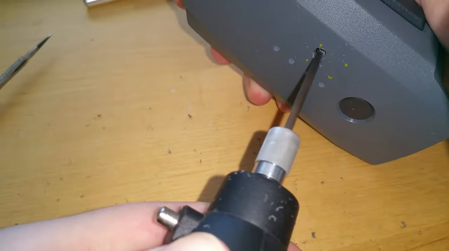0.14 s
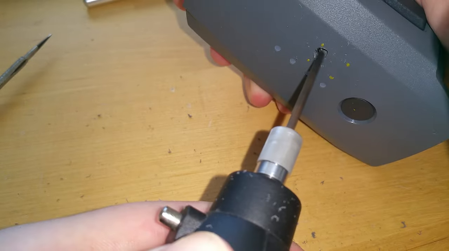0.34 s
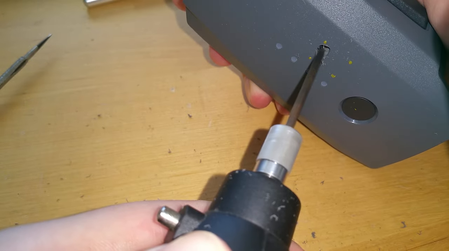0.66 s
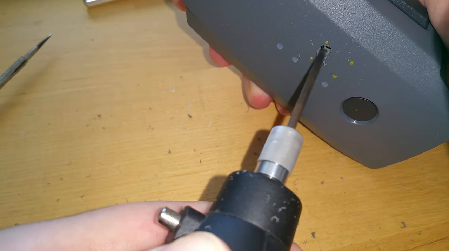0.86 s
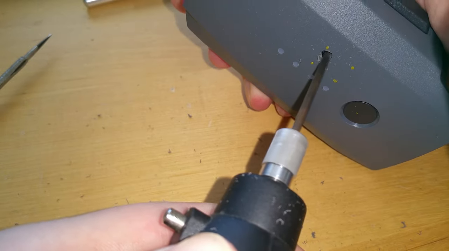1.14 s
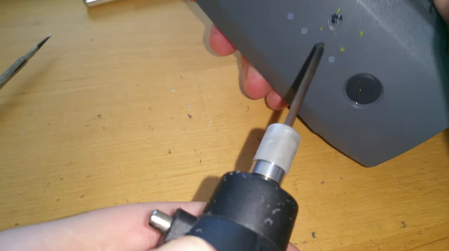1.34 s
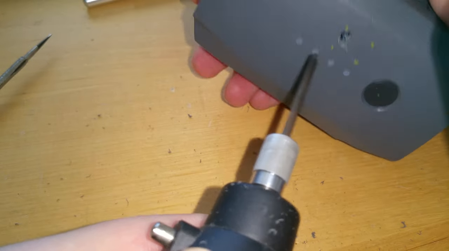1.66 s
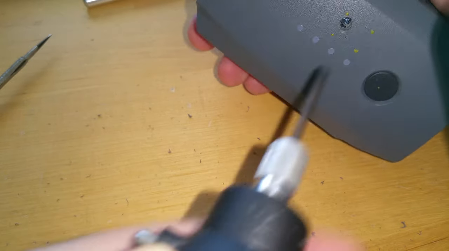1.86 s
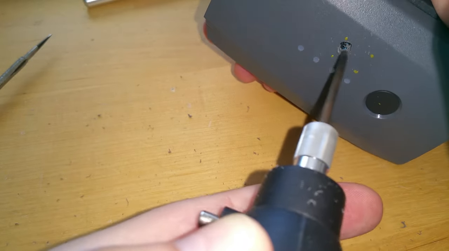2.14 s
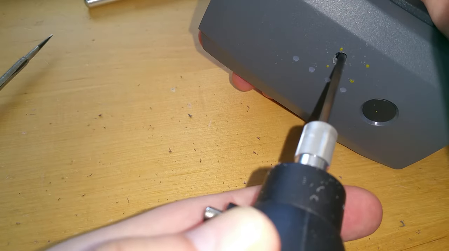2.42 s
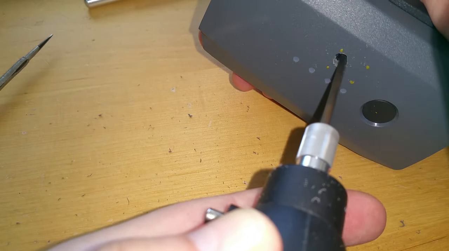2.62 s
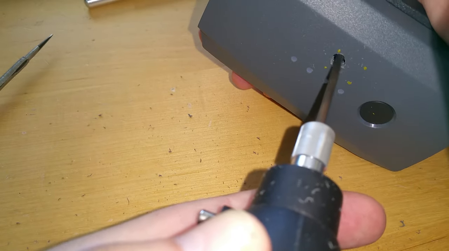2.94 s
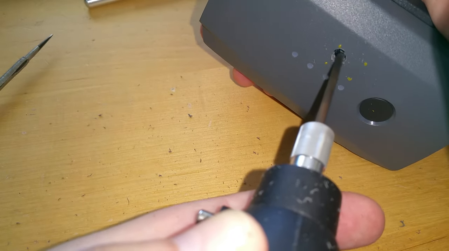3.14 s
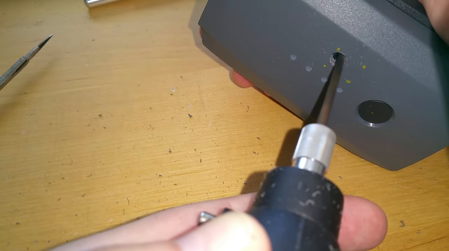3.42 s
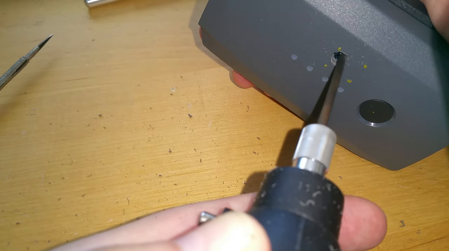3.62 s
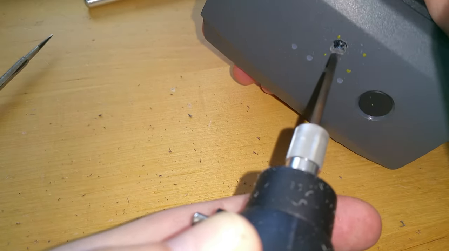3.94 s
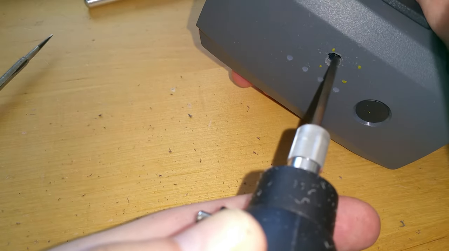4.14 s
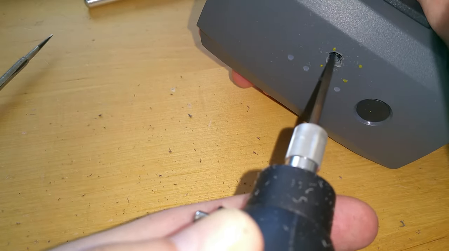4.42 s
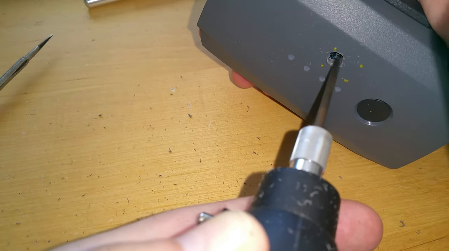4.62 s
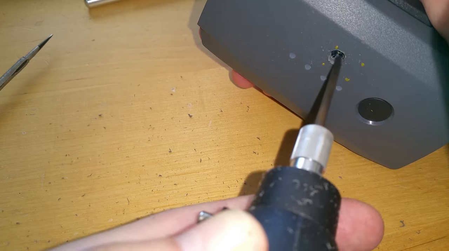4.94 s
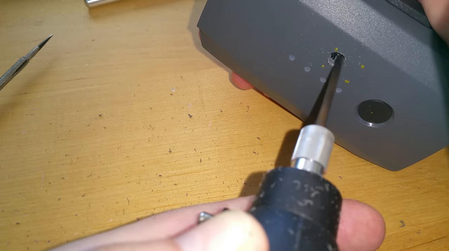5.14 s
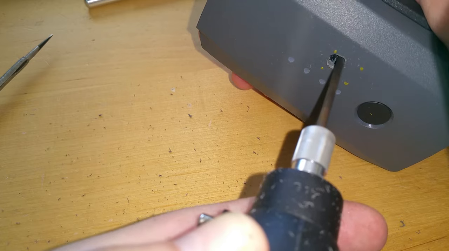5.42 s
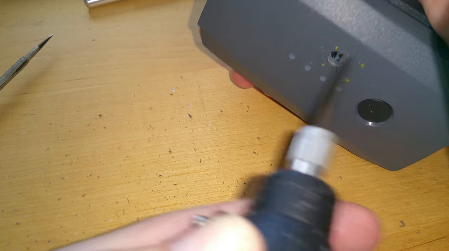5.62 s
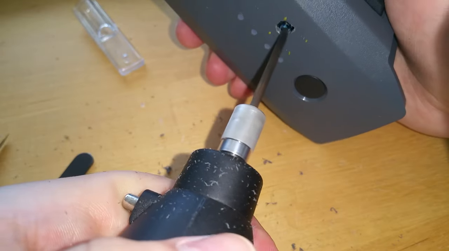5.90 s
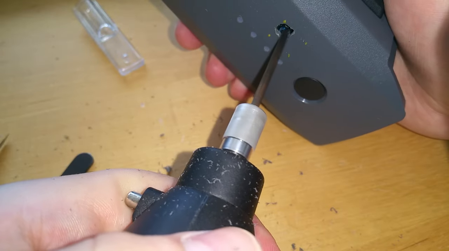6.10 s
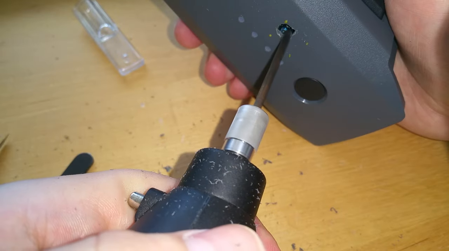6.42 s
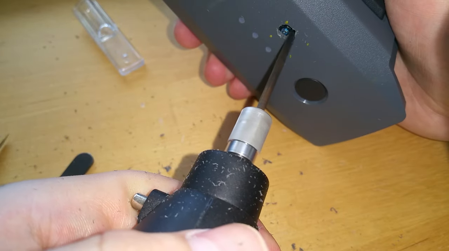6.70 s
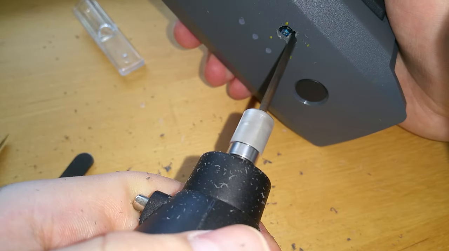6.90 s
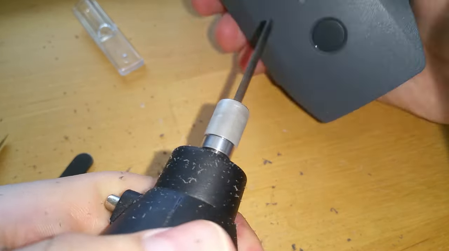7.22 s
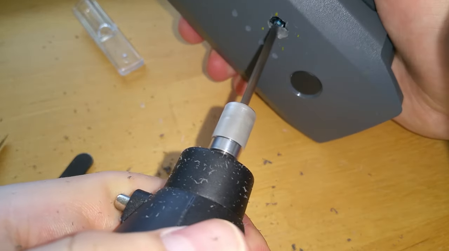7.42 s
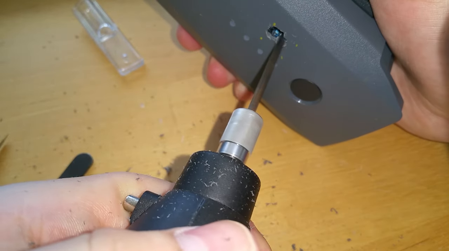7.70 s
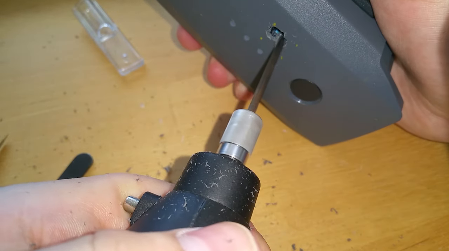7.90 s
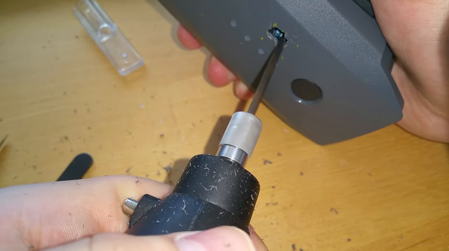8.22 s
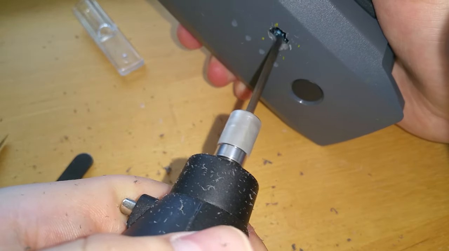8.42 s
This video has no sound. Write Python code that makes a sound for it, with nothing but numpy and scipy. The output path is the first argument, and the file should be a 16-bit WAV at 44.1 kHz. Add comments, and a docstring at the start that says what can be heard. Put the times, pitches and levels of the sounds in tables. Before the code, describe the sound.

A small rotary tool whines high and buzzy up close, its bit screeching and sizzling against plastic in repeated touches, with brief puffs of air.

```python
"""At a desk, a handheld rotary tool runs close to a camera's two microphone ports and widens a hole in a shell.
The motor's whine is a comb of tones chopped by its speed controller; its fan hisses as coloured noise.
At each touch the bit scrapes the plastic once a turn, as shaft harmonics with a spray of chips, and drags
the speed down. A draught flutters on the left port as lumpy noise; a short tail answers the tool.
The sound falls into two stretches: the motor's speed and tone switch at once where the second starts."""
import sys
import numpy as np
from scipy import signal
from scipy.fft import rfft, irfft, next_fast_len
from scipy.io import wavfile
from scipy.ndimage import map_coordinates

SR = 44100
rng = np.random.default_rng(int(sys.argv[2]) if len(sys.argv) > 2 else 0)


def log_audio(samples):
    """Write samples as a 16-bit WAV file to the path given in sys.argv[1]."""
    # one column per channel
    frames = np.atleast_2d(samples).T
    # limit to full scale, then quantise
    limited = np.clip(frames, -1, 1)
    pcm = np.round(limited * 32767).astype(np.int16)
    wavfile.write(sys.argv[1], SR, pcm)


N = 377055
TIME = np.arange(N) / SR
CHOP_HZ = 400  # rate of the speed controller
TOP_HZ = 15850  # band limit of the camera


def amp(db):
    """Decibels to gain."""
    return 10 ** (np.asarray(db) / 20)


def unit(x):
    """Scale to rms 1."""
    return x / np.sqrt(np.mean(x ** 2) + 1e-20)


def along(points, hz):
    """Read (frequency [Hz], value) points on a log frequency axis."""
    f, value = np.transpose(points)
    return np.interp(np.log(hz + 1), np.log(f + 1), value)


def curves(rows):
    """One value per sample for each column after the time."""
    seconds, *columns = np.transpose(rows)
    return [np.interp(TIME, seconds, column) for column in columns]


def wobble(rate):
    """A smooth random curve of rms 1, rate knots a second."""
    knots = rng.standard_normal(int(N * rate / SR) + 4)
    return unit(map_coordinates(knots, [TIME * rate], order=2))


def filtered(x, response):
    """x passed through a complex response of frequency."""
    size = next_fast_len(N + 8192)
    spectrum = rfft(x, size) * response(np.fft.rfftfreq(size, 1 / SR))
    return irfft(spectrum, size)[..., :N]


def noise(colour):
    """Coloured noise of rms 1."""
    return unit(filtered(rng.standard_normal(N), lambda hz: amp(along(colour, hz))))


def bursts(rows):
    """Envelope of short bell-shaped bursts."""
    total = 0
    for centre, length, db in rows:
        squared = ((TIME - centre) / length) ** 2
        total = total + amp(db) * np.exp(-2 * np.minimum(squared, 20))
    return total


def angle(speed):
    """Angle [radians] reached at a rate of turning [Hz]."""
    return 2 * np.pi * np.cumsum(speed) / SR


def since(start):
    """Seconds passed since a moment, 0 before it."""
    return np.maximum(TIME - start, 0)


def gate(start, end, attack, release):
    """Attack, hold and release."""
    return (1 - np.exp(-since(start) / attack)) * np.exp(-since(end) / release)


def lag(x, seconds):
    """x followed with inertia."""
    keep = np.exp(-1 / (seconds * SR))
    return signal.lfilter([1 - keep], [1, -keep], x)


def held(rows):
    """One value per sample for each column of a table with a row for each stretch."""
    stretch = (TIME >= RUNS[1][0]).astype(int)
    return np.array(rows, float)[stretch].T


# the speed in the two stretches: (start [s], free speed [Hz], speed still to regain [Hz])
RUNS = [(0, 1137.4, 64), (5.81, 1152.8, 92)]
# the speed answers a load in two stages, and the share of the quick one
QUICK_S, SLOW_S, QUICK_SHARE = .149, 1.983, .531


def shaft_speed():
    """The motor creeps toward its free speed; every touch drags it down, and it recovers after."""
    start, free, deficit = held(RUNS)
    drag = 0
    for begin, end, _, *row in TOUCHES:
        drag = drag + np.interp(TIME, [begin, (begin + end) / 2, end], row[:3], left=0, right=0)
    sag = QUICK_SHARE * lag(drag, QUICK_S) + (1 - QUICK_SHARE) * lag(drag, SLOW_S)
    return free - deficit * np.exp((start - TIME) / SLOW_S) - sag + .6 * wobble(25)


# the motor as the hand moves it, before trims:
# (time [s], whine level [dB], fan level [dB])
MOTOR = [(0.08, -36, -46.5), (0.3, -40, -51.5), (1.4, -41.5, -51), (1.8, -38.5, -44), (1.96, -28.5, -45.5),
         (2.1, -37.5, -43), (2.33, -35.5, -42.5), (2.55, -46, -49.5), (4.03, -41.5, -47),
         (4.6, -45.5, -50.5), (5.2, -40.5, -47), (5.8, -41.5, -47), (6.1, -43, -45.5), (6.5, -43.5, -55.5),
         (7.15, -42, -49), (7.5, -43.5, -46), (8.15, -51.5, -53.5), (8.55, -49, -47.5)]
# the motor's tone in each stretch: (casing resonance [Hz], its width [Hz],
# shaft tones over the fan level [dB], bearing tones over the fan level [dB])
MOTOR_TONE = [(9300, 360, 0.5, -6), (8000, 840, -3.5, -16)]
# tones of the spinning shaft: (multiple of the speed, relative level [dB])
SHAFT = [(1, -26), (2, -16), (3, -6.5), (4, -11.5), (5, -23), (7, -12), (11, -20), (13, -10.5), (14, -9.5)]
# tones of the bearing: (multiple of the speed, relative level [dB])
BEARING = [(2.553, -7), (7.447, -1)]
# the commutator's octave as it rises through the treble: (frequency [Hz], level [dB])
OCTAVE = [(14200, -54), (15000, -43), (15800, -43.5)]
# colour of the fan's hiss: (frequency [Hz], relative density [dB per Hz])
FAN = [(30, -31), (110, -54), (190, -29.5), (270, -34), (500, -28.5), (1200, -21.5), (2000, -16),
       (3000, -4.5), (3800, -5), (4600, -2.5), (5700, 2), (7500, 3), (10000, -2.5), (13000, -3),
       (16000, -4)]


def motor(speed, whine_db=-3.5, fan_db=3.5, waver_db=2, chop_share=0.13, spread=0.51):
    """Commutator whine, shaft and bearing tones, and fan hiss; spread is the comb's phase curve [radians]."""
    whine_level, fan_level = curves(MOTOR)
    casing_hz, width_hz, shaft_db, bearing_db = held(MOTOR_TONE)
    shaft = angle(speed) + 0.0084 * wobble(83)
    chop = 2 * np.pi * CHOP_HZ * TIME
    # the chopped current splits the eighth shaft order into a comb, which the casing shapes
    comb, power = 0, 0
    for side in range(-5, 6):
        hz, phase = 8 * speed + side * CHOP_HZ, 8 * shaft + side * chop
        off = hz - casing_hz
        gain = 1 / (1 + 1j * off / width_hz) / (1 + (off / 1300) ** 2)
        tone = np.cos(phase + np.angle(gain) + spread * side ** 2)
        comb = comb + abs(gain) * tone * amp(1.9 * wobble(12))
        power = power + abs(gain) ** 2 / 2
    whine = amp(whine_level + whine_db) * comb / np.sqrt(power)
    octave = amp(along(OCTAVE, 16 * speed)) * np.sin(16 * shaft) * (1 + .5 * np.cos(chop))

    def tones(orders):
        """Wavering tones locked to the shaft."""
        return sum(amp(db + waver_db * wobble(14)) * np.sin(order * shaft) for order, db in orders)

    hiss = amp(fan_db) * noise(FAN) * (1 + chop_share * np.cos(chop)) * amp(1.2 * wobble(40))
    turning = amp(shaft_db) * tones(SHAFT) + amp(bearing_db) * tones(BEARING)
    return whine + octave + amp(fan_level) * (turning + hiss)


# the speed controller's buzz: (time [s], level [dB])
BUZZ = [(0, -89.5), (6.95, -95.5), (7.1, -81), (8.55, -87)]


def controller_buzz():
    """A faint pure tone at the chopping rate."""
    return amp(curves(BUZZ)[0]) * np.sin(2 * np.pi * CHOP_HZ * TIME)


def room(x, t60=0.082, left_db=-12.5, right_db=-7.5, sway=1.54):
    """Hands, shell and desk answer with a short tail at each port, which shifts as the hands move."""
    t = np.arange(SR // 4) / SR
    tails = rng.standard_normal((2, 2, len(t))) * amp(-60 * t / t60) * (t > .001)
    tails /= np.linalg.norm(tails, axis=2, keepdims=True)
    first, second = signal.fftconvolve(x[None, None], tails, axes=2)[..., :N]
    pose = sway * np.array([wobble(1.963), wobble(1.994)]) + 2 * TIME
    return amp([[left_db], [right_db]]) * (np.cos(pose) * first + np.sin(pose) * second)


# touches of the bit: (start [s], end [s], attack before each range's factor [s],
# load on the speed before its lag, at the start, midway and at the end [Hz],
# drone, ring, screech and sizzle level before each range's trim [dB], roughness at the mean speed [0-1])
TOUCHES = [(0.184, 0.503, 0.024, 0.0, 63.4, 53, -53, -49.5, -34.0, -34.5, 0.49),
           (0.586, 0.9, 0.01, 21.0, 89, 113, -51.5, -48, -34, -37, 0.47),
           (0.929, 1.33, 0.013, 15.0, 103, 133.0, -51.5, -52, -34.5, -35.5, 0.38),
           (2.388, 2.8, 0.015, 18.0, 191, 205, -44.5, -42.5, -39.5, -35, 0.57),
           (2.826, 3.089, 0.02, 0.0, 101, 97, -45.5, -47.0, -37.5, -32, 0.43),
           (3.204, 3.554, 0.02, 0.0, 103, 89, -41, -44.5, -39.5, -34.5, 0.4),
           (3.658, 3.916, 0.02, 16.0, 62, 117.0, -42, -44.5, -36, -31.5, 0.45),
           (4.163, 4.393, 0.006, -0.5, 178, 120, -48.5, -47.5, -36, -33, 0.41),
           (4.414, 4.506, 0.005, 27.0, 36, 59, -51, -52, -38, -39, 0.76),
           (4.552, 4.84, 0.012, 12.0, 154, 87, -49, -52.5, -38.5, -34.5, 0.53),
           (5.034, 5.08, 0.003, 73, 42.0, 39, -48.5, -53, -39.5, -33, 0.7),
           (5.111, 5.523, 0.01, 3.0, 113, 140, -43.5, -44.5, -37.5, -31.5, 0.34),
           (5.574, 5.678, 0.0025, 9, 70.0, 39.2, -45.5, -45.0, -39.5, -35.5, 0.45),
           (6.015, 6.081, 0.003, 63.5, 1.03, 11.0, -50.0, -41, -35, -42.5, 0.65),
           (6.104, 7.084, 0.014, 0.5, 300, 320, -58.5, -51.5, -36, -35.0, 0.38),
           (7.58, 8.094, 0.005, 22.5, 226, 84, -53.5, -46, -34.5, -35.0, 0.39),
           (8.193, 8.432, 0.0021, 0.0, 133, 134, -52, -48.5, -37.5, -36.5, 0.65),
           (8.501, 8.56, 0.004, 51, 48, 48, -56.5, -46, -34.5, -33, 0.23)]
# the shell's four ranges (drone, ring, screech, sizzle): (level trim [dB], attack over that of the touch,
# fade per Hz of slowing [dB], unsteadiness [dB], grit [dB])
RANGES = [(-3.5, 0.79, 0.093, 2.5, -16), (-.5, 0.69, 0.075, 2.5, -16), (-0.5, 0.53, 0.0191, 1.6, -9),
          (0, 1.12, 0.0089, 2, -2)]
# brief grazes of the bit on the rim: (time [s], length [s], level before colour [dB])
GRAZES = [(0.16, 0.0031, -35.5), (0.566, .007, -39), (2.375, 0.022, -37), (4.118, 0.013, -40.5),
          (4.535, 0.017, -43), (4.988, 0.0053, -34.5), (5.688, 0.0093, -47), (5.703, .006, -46),
          (7.531, 0.0057, -37), (8.44, 0.0024, -41)]
# colour of the grazes: one level for each of the four ranges [dB]
GRAZE_COLOUR_DB = [-8.5, -3.5, -0.5, -1.5]
# the bit catches and the shell rings out: (time [s], length [s], level before colour [dB])
CATCHES = [(2.425, 0.014, -41), (2.52, .05, -34.5), (5.23, 0.085, -46), (7.68, 0.064, -46.5)]
# colour of the catches: one level for each of the four ranges [dB]
CATCH_COLOUR_DB = [-10, 0, -9, -20]
RELEASE_S = 0.0017
CHATTER_DB_PER_HZ = .035  # rise of the roughness as the bit digs in and slows the shaft


def pressure(speed):
    """Contact strength in each range, and roughness: as the bit digs in, the ring fades and the chatter grows."""
    level_db, slowness, fade, unsteady_db, _ = np.transpose(RANGES)[..., None]
    strength, rough = np.zeros((len(RANGES), N)), np.full(N, .5)
    for start, end, attack, _, _, _, *touch_db, roughness in TOUCHES:
        on = (TIME > start) & (TIME < end + 10 * RELEASE_S)
        t = TIME[on]
        slowing = speed[on].mean() - speed[on]  # below the mean speed of this touch
        rise = 1 - np.exp((start - t) / (attack * slowness))
        envelope = rise * np.exp(-np.maximum(t - end, 0) / RELEASE_S)
        strength[:, on] += envelope * amp(np.c_[touch_db] + level_db - fade * slowing)
        rough[on] = roughness * amp(CHATTER_DB_PER_HZ * slowing)
    strength *= amp(unsteady_db * np.array([wobble(14) for _ in RANGES]))
    grazes = bursts(GRAZES) * amp(np.c_[GRAZE_COLOUR_DB])
    catches = bursts(CATCHES) * amp(np.c_[CATCH_COLOUR_DB])
    return strength + grazes + catches, rough


# colour of the scraped shell, within each range: (frequency [Hz], relative level [dB])
SHELL = [(1100, -66), (2150, -15.5), (2700, -14), (3260, -1.5), (3690, -10), (4330, -5.5), (5400, -3.5),
         (6300, 5), (7500, 4), (8500, 5.5), (10400, -1.5), (11700, 0.5), (12800, 6), (13900, 8), (15800, 2)]
# the sizzle peaks higher or lower with the bit's seat in the hole: (time [s], frequency [Hz])
SIZZLE_PEAK = [(0, 12500), (1.35, 12900), (2.4, 14320), (3.4, 13870), (5.6, 14150), (6.3, 14510),
               (7, 13340), (7.7, 13200), (8.5, 13800)]
# colour of the spray of chips, within each range: (frequency [Hz], relative density [dB per Hz])
SPRAY = [(2000, -22), (3200, -8), (3800, -15), (4400, -4), (5400, -4), (6300, 6), (8500, 0), (10400, -12),
         (11700, 3), (12800, 5.5), (14000, 17), (15800, 7)]
SIZZLE_PEAK_DB, SIZZLE_WIDTH_HZ = 5, 750


def bit(speed, slip=0.24, skip=0.064, waver_db=2.5, flutter_db=4.5, judder_db=2.5):
    """One scrape a turn: a stack of shaft harmonics, smeared as the bit slips and skips."""
    strength, rough = pressure(speed)
    scrape = angle(speed) + rough * (slip * wobble(110) + skip * wobble(700))
    peak_hz, = curves(SIZZLE_PEAK)
    stacks, powers = np.zeros((2, len(RANGES), N))
    for order in range(2, 18):
        band = (order > 3) + (order > 5) + (order > 8)  # drone, ring, screech or sizzle
        hz = order * speed
        peak_db = SIZZLE_PEAK_DB / (1 + ((hz - peak_hz) / SIZZLE_WIDTH_HZ) ** 2)
        gain = amp(along(SHELL, hz) + peak_db) * (hz < TOP_HZ + 200)
        # the contact point wanders round the rim and favours now one harmonic, now another
        wander = amp(waver_db * wobble(22) + flutter_db * rough * wobble(130))
        stacks[band] += gain * unit(wander) * np.cos(order * scrape + rng.uniform(0, 2 * np.pi))
        powers[band] += gain ** 2 / 2
    stacks /= np.sqrt(powers)
    # chips tear off in a short spray at each scrape, the more so when the bit chatters
    spray = noise(SPRAY) * (1 + np.cos(scrape)) * amp(4.3 * wobble(300))
    limits_hz = [(2000, 3700), (3700, 5800), (5800, 9500), (9500, 16000)]
    grit = np.array([unit(filtered(spray, lambda hz: (hz > lo) & (hz <= hi))) for lo, hi in limits_hz])
    grit *= rough ** 2 * amp(np.array(RANGES)[:, -1:])
    cutting = np.sum(strength * (stacks + grit), axis=0)
    return cutting * unit(amp(judder_db * rough * wobble(190)))


# moving air on the left port, before trim: (time [s], level [dB])
DRAUGHT = [(0, -105), (1.4, -87), (1.8, -72), (1.9, -52), (2.06, -70), (2.7, -67), (3.25, -62.5),
           (4.1, -54), (4.4, -66.5), (4.7, -77), (4.88, -57), (5.66, -59), (5.8, -46.5), (5.83, -64.5),
           (6.25, -63), (6.6, -83), (8.55, -105)]
# gusts of that air, before trim: (time [s], length [s], level [dB])
GUSTS = [(1.885, 0.026, -36), (1.925, 0.048, -42.5), (2.015, 0.004, -34), (5.565, 0.0091, -49),
         (5.795, 0.024, -44.5), (5.91, 0.006, -48), (5.98, 0.0063, -54), (6.005, 0.0069, -52),
         (6.06, 0.0081, -46), (6.13, 0.088, -53.5)]
# colour of the flutter, before its shift in pitch: (frequency [Hz], relative density [dB per Hz])
FLUTTER = [(25, -34), (70, -20.5), (140, -6.5), (260, 2.5), (450, 5), (800, -2.5), (1200, -9.5),
           (1800, -14.5), (3000, -17), (6000, -53)]
GUST_BRIGHTER = 1.34  # faster air sheds smaller eddies: the gusts' colour is shifted up by this factor


def draught(level_db=-2, gust_db=-2):
    """Lumpy turbulence with brighter gusts on the left port, hardly any on the right."""
    flow = amp(curves(DRAUGHT)[0] + level_db) * unit(amp(1.0 * wobble(50) + 4.3 * wobble(220)))
    gusts = amp(gust_db) * bursts(GUSTS) * unit(amp(3.1 * wobble(260)))

    def eddies(strength, shift):
        """Separate flutter noise for each port, its colour shifted in frequency."""
        rough_air = rng.standard_normal((2, N)) * strength
        return filtered(rough_air, lambda hz: unit(amp(along(FLUTTER, hz / shift))))

    return (eddies(flow, 0.93) + eddies(gusts, GUST_BRIGHTER)) * amp([[0], [-36]])


# the bit leans on the shell: (start [s], end [s], attack [s], release [s])
LEAN = (6.38, 7.075, 0.085, .012)
LEAN_DB = -58.5  # peak


def leaning_hum(speed):
    """The shell hums at the shaft speed when the bit leans on it."""
    return amp(LEAN_DB) * gate(*LEAN) * np.sin(angle(speed))


# direct sound at the right port against the left: (frequency [Hz], level [dB])
FAR_PORT = [(100, 4.5), (1000, -4.5), (2150, -1), (3200, -17), (4300, -4), (5300, -14.5), (6400, -9),
            (7500, -20.5), (8500, -13.5), (9500, -11.5), (11000, -10.5), (15000, -23.5)]
# its delay in phase: (frequency [Hz], lag [radians])
PORT_LAG = [(100, -0.5), (2150, 1), (3270, 0.88), (4310, 5), (7320, 10), (9560, 10), (11900, 13),
            (14800, 12.5)]
# the hand shades the right port: (time [s], level [dB])
SHADE = [(0, 0.5), (1.3, 0.5), (2, -1.5), (5.8, 0.1), (6.3, -2), (7, 0.5), (7.25, 0.9), (8.3, -2)]


def scene():
    """The tool faces the left port and reaches the right one partly by reflection; the draught adds to both."""
    speed = shaft_speed()
    tool = motor(speed) + controller_buzz() + bit(speed) + leaning_hum(speed)
    far = filtered(tool, lambda hz: amp(along(FAR_PORT, hz)) * np.exp(-1j * along(PORT_LAG, hz)))
    left, right = np.array([tool, far]) + room(tool)
    return np.array([left, right * amp(curves(SHADE)[0])]) + draught()


def record(dry):
    """The camera keeps nothing above its band limit."""
    return filtered(dry, lambda hz: hz < TOP_HZ)


dry = scene()
out = record(dry)
log_audio(out)
```